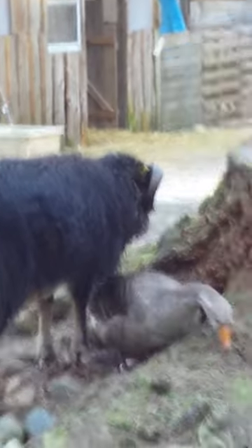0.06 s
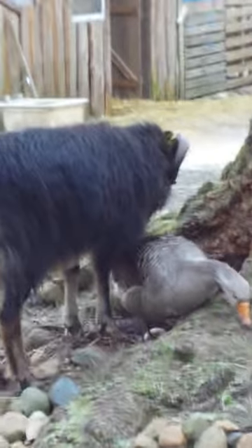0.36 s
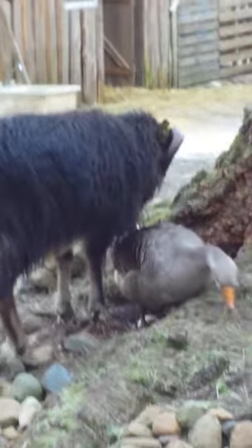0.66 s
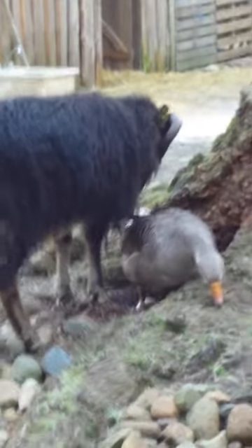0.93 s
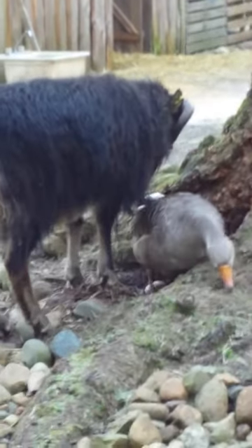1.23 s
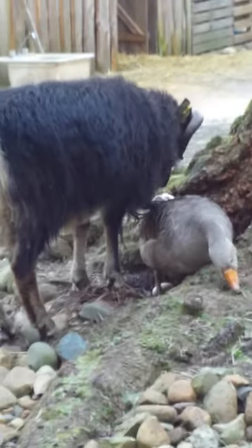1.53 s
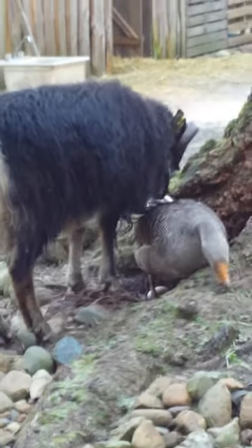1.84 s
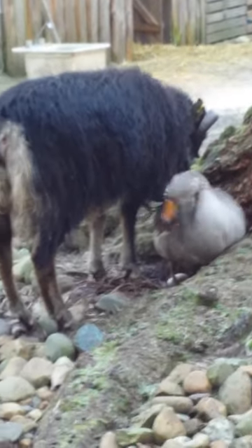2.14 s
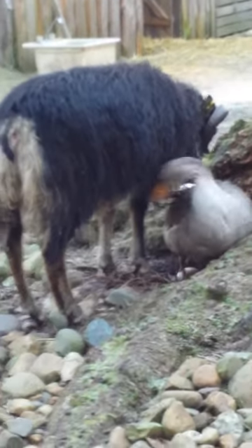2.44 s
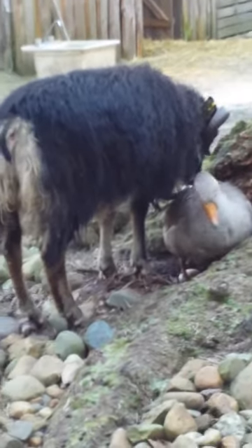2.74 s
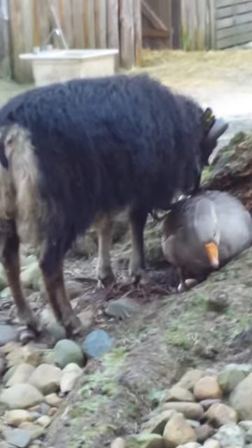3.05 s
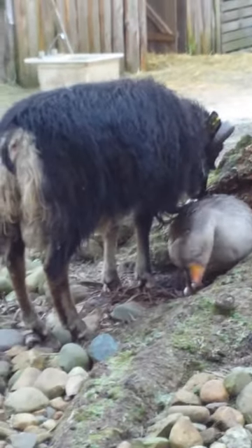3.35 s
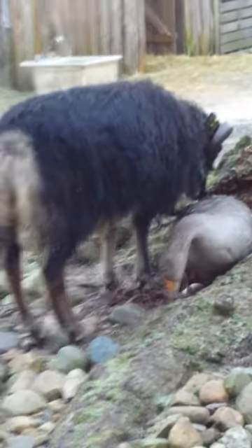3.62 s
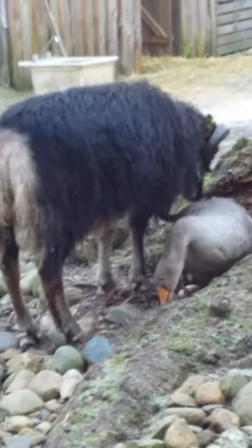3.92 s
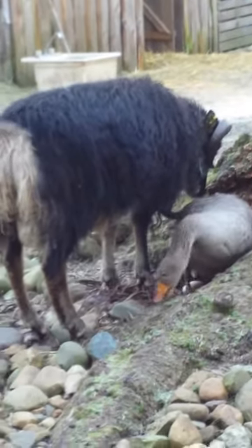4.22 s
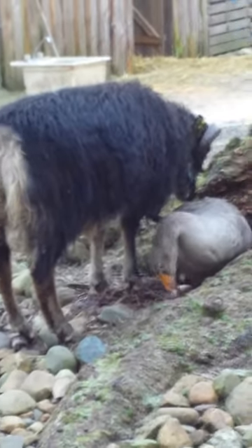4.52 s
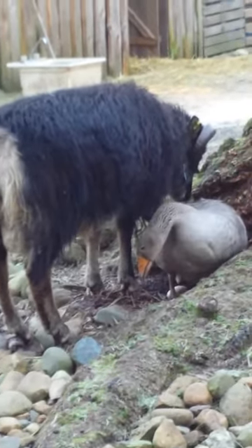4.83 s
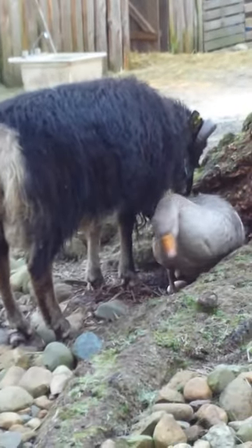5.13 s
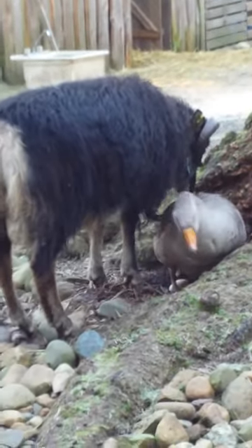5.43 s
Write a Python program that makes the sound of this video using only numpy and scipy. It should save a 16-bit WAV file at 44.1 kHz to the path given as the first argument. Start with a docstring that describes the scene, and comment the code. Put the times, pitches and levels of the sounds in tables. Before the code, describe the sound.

Fingers rub, bump and once sharply tap the microphone, while foraging animals faintly rustle straw and snap twigs over distant outdoor rumble.

```python
"""A goat and a goose in a quiet pen

As the animals forage, hooves thud on earth, straw rustles and twigs snap. Small birds peep far off.
Fingers shift on a hand-held phone, rubbing its case and bumping its two microphone ports (the
little sound holes); once they tap the left port with a sharp knock. Underneath lie distant outdoor
rumble, microphone hiss, a very faint electronic whine and one faint whistle like the whine swelling."""
import sys
import numpy as np
from scipy import signal
from scipy.fft import rfft, irfft
from scipy.io import wavfile
from scipy.ndimage import uniform_filter1d

SR = 44100
rng = np.random.default_rng(int(sys.argv[2]) if len(sys.argv) > 2 else 0)


def wrap_up_sound(samples):
    """Save the sound to the file named by the first command line argument, as 16-bit audio."""
    columns = np.atleast_2d(samples).T
    # keep every value between -1 and 1, then stretch to whole-number steps
    tamed = np.clip(columns, -1, 1)
    steps = np.round(tamed * 32767).astype(np.int16)
    wavfile.write(sys.argv[1], SR, steps)


N = 245637
T = np.arange(N) / SR

# straw stirred by feet and bill: (time [s], length [s], level [dB])
RUSTLE_TIMES = [(0.852, 0.084, -64.5), (1.083, .042, -67.5), (1.186, 0.075, -69.5), (1.367, 0.069, -68),
                (1.692, .07, -66), (3.938, 0.052, -67), (4.098, 0.1, -67), (4.264, 0.067, -63.5)]


def hooves(contact_s=0.0069, detune=0.014, crumble_db=-15, crumble_s=0.018):
    """Each hoof makes the packed earth ring briefly and crumbles a little soil."""
    # the tones of the ground: (pitch [Hz], time to fade by 60 dB [s], level [dB])
    earth_tones = [(214, 0.029, 3.5), (264.6, 0.041, -5), (502, 0.024, -9), (675, 0.03, -19)]
    out, t = np.zeros((2, N)), T[:SR // 5]
    for s, db in footfalls():
        ring = 0
        for hz, fade_s, tone_db in earth_tones:
            pitch_hz = hz * (1 + detune * rng.standard_normal())
            ring += undb(tone_db - 60 * t / fade_s) * np.sin(2 * np.pi * pitch_hz * t)
        weight = 1 - np.exp(-(t / contact_s) ** 2)  # the weight comes down gradually
        thud = -ring * weight
        thud /= np.abs(thud).max()
        noise = rng.standard_normal((2, len(t)))
        soil = resonate(noise, hz=330, q=0.37) * np.exp(-t / crumble_s)
        add(out, s, undb(db) * pan(2) * (thud + undb(crumble_db) * soil))
    return out


def footfalls(gap_s=0.0136, settle_db=-9):
    """A hoof lands, then settles in two weaker touches. Gives (time [s], level [dB])."""
    # hooves landing: (time [s], level [dB])
    landings = [(2.096, -47), (3.8866, -40), (4.1426, -40.5)]
    return [(s + k * gap_s, db + (settle_db if k else 0)) for s, db in landings for k in range(3)]


def twigs(width_octaves=0.93, onset_s=0.00038, crack_s=0.00085, tail_db=-24, tail_s=0.019):
    """A twig breaks in a burst of a few milliseconds, and the litter around it settles."""
    # twigs snapping: (time [s], peak level [dB], pitch [Hz])
    snaps = [(1.0805, -45, 4100), (1.2716, -51.5, 5400), (1.3008, -56.5, 3270), (1.5806, -42.5, 4350),
             (1.6039, -46, 5170), (2.2143, -52.5, 4130), (2.6617, -53.5, 3900), (3.899, -50.5, 5500),
             (4.099, -50.5, 5360), (4.2738, -45.5, 5450), (4.2996, -50.5, 5500), (5.3119, -52.5, 4670)]
    out, t = np.zeros((2, N)), T[:SR // 12]
    fade = np.exp(-t / crack_s) + undb(tail_db) * np.exp(-t / tail_s)
    shape = (1 - np.exp(-t / onset_s)) * fade
    for s, db, hz in snaps + stalks():
        burst = shape * stereo_noise(len(t), apart=0.58)
        edges_hz = hz * 2 ** (width_octaves * np.array([-0.5, 0.5]))
        crack = signal.sosfilt(signal.butter(3, edges_hz, "band", fs=SR, output="sos"), burst)
        add(out, s, undb(db) * crack / np.abs(crack).max(axis=1, keepdims=True))
    return out


def stalks(count=2, above_rustle_db=9, scatter_db=6, typical_hz=5700, scatter_octaves=0.15):
    """Small stalks break by chance in each rustle. Gives (time [s], peak level [dB], pitch [Hz])."""
    rows = []
    for s, length, db in RUSTLE_TIMES:
        for k in range(count):
            break_s = s + length * (k + rng.random()) / count
            peak_db = db + above_rustle_db + scatter_db * rng.standard_normal()
            hz = typical_hz * 2 ** (scatter_octaves * rng.standard_normal())
            rows.append((break_s, peak_db, hz))
    return rows


def straw(crackle_db=4, idle_db=-79):
    """Many tiny crackles swell whenever the straw is stirred."""
    # the bright sound of straw: (frequency [Hz], level [dB])
    spectrum = [(1200, -39), (2500, -8), (4200, -4), (6400, 3), (8500, -7), (12000, -11), (16000, -15)]
    stir = np.full((2, N), undb(idle_db))
    for s, length, db in RUSTLE_TIMES:
        add(stir, s, undb(db) * swell(length))
    crackles = rng.standard_normal((2, N)) * undb(crackle_db * wander(500))
    return colour(crackles, spectrum) * stir


def scuffs():
    """Short, dull scrapes, each ringing hollowly around one pitch."""
    # soft scrapes: (time [s], length [s], level [dB], pitch [Hz])
    scrapes = [(2.087, 0.073, -61.5, 760), (2.428, 0.07, -68.5, 1890), (2.44, 0.1, -64.5, 880),
               (2.753, 0.072, -68, 800), (3.024, 0.045, -62.5, 790), (3.241, 0.041, -59.5, 740),
               (3.275, 0.039, -66, 935), (3.886, .04, -66, 650), (4.145, 0.072, -66, 750),
               (4.228, 0.049, -61, 377)]
    out = np.zeros((2, N))
    for s, length, db, hz in scrapes:
        shape = swell(length)
        scrape = stereo_noise(len(shape), apart=0.26)
        add(out, s, undb(db) * shape * resonate(scrape, hz, q=3.6))
    return out


def fingers(tap_s=2.7158, bump_rise_ms=(0.72, 1.07), doubling_db=29):
    """A touch raises the air pressure in a port: slowly for a dull bump, at once for a sharp knock."""
    # soft finger bumps: (time [s], pressure step [dB], port [0 left, 1 right])
    bumps = [(0.059, -26, 1), (0.171, -29, 1), (1.660, -17, 0), (1.681, -23.5, 0), (1.711, -10.5, 0),
             (1.727, -16.5, 0), (1.740, -19, 0), (1.766, -18.5, 0), (1.793, -18.5, 0), (1.839, -18.5, 0),
             (2.273, -27.5, 1), (2.472, -20, 1), (2.504, -24, 1), (2.546, -26, 1), (2.843, -25.5, 0),
             (2.879, -25, 0), (3.18, -30, 0), (3.238, -29, 0), (3.91, -28.5, 0), (4.345, -32, 0)]
    touches = [(tap_s, contact(db=-0.46, side=0, rise_ms=0.014, across_db=-62))]
    for s, db, side in bumps + nudges():
        rise_ms = bump_rise_ms[side] * 2 ** (-db / doubling_db)  # a softer bump is slower
        touches.append((s, contact(db, side, rise_ms, across_db=-34)))
    push = np.zeros((2, N))  # change of pressure per sample
    for s, touch in touches:
        add(push, s - touch.shape[1] // 2 / SR, touch)  # centred on its time
    return port(np.cumsum(push, axis=1))


def contact(db, side, rise_ms, across_db):
    """One touch pushes air into one port, and faintly into the other."""
    bell = signal.windows.gaussian(SR // 20, rise_ms * SR / 1000)
    port_db = [[across_db], [0]] if side else [[0], [across_db]]
    return undb(db) * bell / bell.sum() * undb(port_db)


def port(pressure, corner_hz=90, q=0.82, leak_hz=22):
    """A port passes no steady pressure: a step becomes a spike and a slow swing back."""
    w = 2 * np.pi * corner_hz
    swing = signal.lfilter(*signal.bilinear([1, 0, 0], [1, w / q, w * w], SR), pressure)
    return signal.lfilter(*signal.butter(1, leak_hz, "high", fs=SR), swing)


def nudges(per_second=13, above_rub_db=26, scatter_db=7.5):
    """Faint chance bumps grow with the rubbing. Gives (time [s], pressure step [dB], port [0 or 1])."""
    rub_db, rows = 20 * np.log10(grip()), []
    for slot, (when, where, size) in enumerate(rng.random((200, 3))):
        s, side = (slot + when) / per_second, round(where)
        if s < T[-1]:
            db = rub_db[side, int(s * SR)] + above_rub_db + scatter_db * (2 * size - 1)
            rows.append((s, db, side))
    return rows


def rubbing(slip_db=4):
    """Skin drags over the case in small uneven slips, different at each port."""
    # the dull sound of skin on the case: (frequency [Hz], level [dB])
    spectrum = [(20, -1.5), (80, 5.5), (200, -9.5), (450, -12.5), (950, -11), (1500, -21), (2000, -23.5),
                (3500, -26), (6500, -19.5), (10000, -26.5), (16000, -27.5)]
    slips = np.array([rng.standard_normal(N) * undb(slip_db * wander(60)) for _ in range(2)])
    return colour(slips, spectrum) * grip()


def grip(fade_s=0.074, still_hand_db=-79):
    """How hard the skin rubs at each port: every shift of the hand eases in, holds and eases out."""
    # shifts of the hand: (time [s], length [s], level [dB], left minus right [dB])
    shifts = [(0, .21, -60, -2), (1.629, 0.3, -54.5, 0), (2.08, 1.38, -64.5, -5.5), (2.39, .22, -59, -4),
              (3.8, 0.64, -68, 0)]
    power = np.full((2, N), undb(still_hand_db) ** 2)
    for s, length, db, pan_db in shifts:
        ease = signal.windows.tukey(int(length * SR), 2 * fade_s / length)
        add(power, s, (ease * undb(db) * pan(pan_db)) ** 2)
    return np.sqrt(power)


def peeps_and_whistle(rise_hz=249, waver=0.031, echo_db=-4, echo_s=0.044):
    """Thin tones glide upward with a quick waver, blurred by short echoes."""
    # one longer, faint 6 kHz whistle, like the electronic whine swelling, then far-off bird peeps:
    # (time [s], length [s], pitch [Hz], level [dB])
    thin_tones = [(0.42, 0.16, 5980, -76), (0.53, 0.068, 8250, -71), (1.39, .025, 7520, -71),
                  (1.443, .022, 6730, -61.5), (1.558, 0.018, 7480, -68), (1.61, 0.015, 6200, -67),
                  (1.757, 0.021, 6330, -67), (4.972, 0.015, 7820, -71)]
    out = np.zeros((2, N))
    for s, length, pitch_hz, db in thin_tones:
        shape = swell(length)
        glide_hz = pitch_hz + rise_hz * np.linspace(-0.5, 0.5, len(shape))
        hz = glide_hz * (1 + waver * wander(700, len(shape)))
        tone = unit(np.sin(2 * np.pi * np.cumsum(hz) / SR))
        add(out, s, undb(db) * shape * tone)
    fences = rng.standard_normal((2, SR // 10)) * np.exp(-T[:SR // 10] / echo_s)
    echo = signal.fftconvolve(out, fences / np.linalg.norm(fences[0]), axes=1)[:, :N]
    return out + undb(echo_db) * echo


def outdoor_rumble(flutter_db=0.4):
    """Far rumble, alike at both ports in the low middle range and unrelated higher up."""
    # the deep sound of the rumble: (frequency [Hz], level [dB])
    spectrum = [(20, -10), (50, 0), (110, -0.5), (250, -5.5), (450, -7.5), (800, -7.5), (1200, -12.5),
                (1800, -20), (3000, -23), (8000, -28.5)]
    # its slow rise and fall: (time [s], level [dB])
    loudness = [(0.0, -58.5), (0.23, -61), (1.1, -61), (2.82, -59), (4.75, -62), (5.57, -61.5)]
    # how alike the two ports hear it: (frequency [Hz], likeness [0 to 1])
    port_likeness = [(40, 0.21), (130, 0.95), (290, 0.83), (640, 0.77), (1410, 0.0093), (3100, 0)]
    likeness = at_frequencies(port_likeness)
    common, apart = rfft(rng.standard_normal((2, N)))
    common, apart = common * np.sqrt(1 + likeness), apart * np.sqrt(1 - likeness)
    air = irfft(np.array([common + apart, common - apart]), N)
    level_db = np.interp(T, *np.transpose(loudness)) + flutter_db * wander(15)
    return colour(air, spectrum) * undb(level_db) * pan(1.3)


def electronics(hiss_db=-69, blip_hz=7020, blips_per_s=21, blip_db=-79, blip_scatter_db=6):
    """Microphone hiss, a faint whine and one tone that blips with uneven strength."""
    # the hiss: (frequency [Hz], level [dB])
    spectrum = [(1000, -4.5), (2200, -6.5), (3500, -4.5), (4600, 0), (5800, 4.5), (7000, 2.5), (8500, -1),
                (11000, -1), (15000, -2.5), (16000, -2.5)]
    # the tones of the whine: (pitch [Hz], level [dB])
    tones = [(6002, -92), (8000, -91), (10002, -99), (12000, -93), (14000, -89.5)]
    hiss = undb(hiss_db) * colour(rng.standard_normal((2, N)), spectrum) * pan(-5.5)
    whine = sum(undb(db + 2 * wander(6)) * unit(np.sin(2 * np.pi * hz * T)) for hz, db in tones)
    pulses = np.maximum(np.sin(2 * np.pi * blips_per_s * T), 0) ** 2
    blips = undb(blip_db + blip_scatter_db * wander(12)) * pulses * np.sin(2 * np.pi * blip_hz * T)
    return hiss + whine + blips


def undb(db):
    """Turn decibels into a number to multiply by."""
    return 10 ** (np.asarray(db) / 20)


def unit(x):
    """Scale x to an average strength (rms) of 1."""
    return x / np.sqrt(np.mean(x ** 2))


def at_frequencies(points):
    """Read a (frequency [Hz], value) table at every frequency in the sound."""
    hz, value = np.transpose(points)
    return np.interp(np.log(np.fft.rfftfreq(N, 1 / SR) + 1), np.log(hz), value)


def colour(x, spectrum):
    """Shape the lows and highs of x by a (frequency [Hz], level [dB]) table, at strength 1."""
    return unit(irfft(rfft(x) * undb(at_frequencies(spectrum)), N))


def resonate(x, hz, q):
    """Filter x twice around one pitch, at strength 1; a higher q (0.5 at least is used) is narrower."""
    peak = signal.iirpeak(hz, max(q, 0.5), fs=SR)
    return unit(signal.lfilter(*peak, signal.lfilter(*peak, x)))


def stereo_noise(size, apart):
    """Noise that both ports share, plus a little that each has alone."""
    return rng.standard_normal(size) + apart * rng.standard_normal((2, size))


def wander(per_second, size=N):
    """A smooth random wobble, about 1 in size."""
    hold = int(SR / per_second)
    steps = np.repeat(rng.standard_normal(size // hold + 2), hold)
    return unit(uniform_filter1d(steps, hold))[:size]


def pan(db):
    """Left and right gains that make the left louder by db."""
    return undb(np.array([db, -db]) / 2).reshape(2, -1)


def add(out, s, x):
    """Mix x into out from time s."""
    start = max(int(round(s * SR)), 0)
    out[:, start:start + x.shape[-1]] += x[..., :max(N - start, 0)]


def swell(length):
    """A soft rise and fall."""
    return signal.windows.tukey(int(length * SR), 0.7)


def scene():
    """The pen and the hand on the phone, heard together."""
    pen = outdoor_rumble() + hooves() + twigs() + straw() + scuffs()
    return pen + peeps_and_whistle() + fingers() + rubbing() + electronics()


def record(dry):
    """The phone cuts off the highest treble."""
    top_hz = 15650
    low_pass = signal.firwin(127, top_hz, fs=SR, window="blackman")
    return signal.fftconvolve(dry, low_pass[None], "same", axes=1)


dry = scene()
out = record(dry)
wrap_up_sound(out)
```